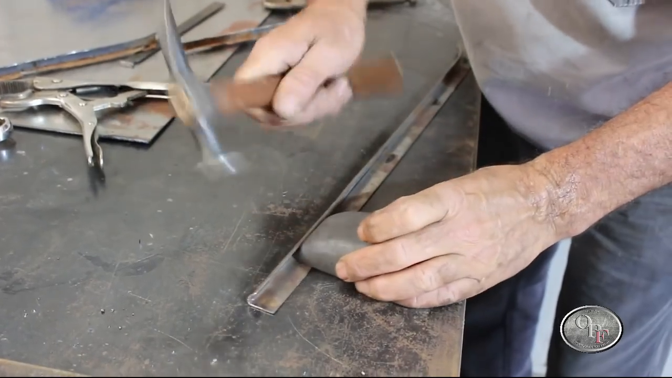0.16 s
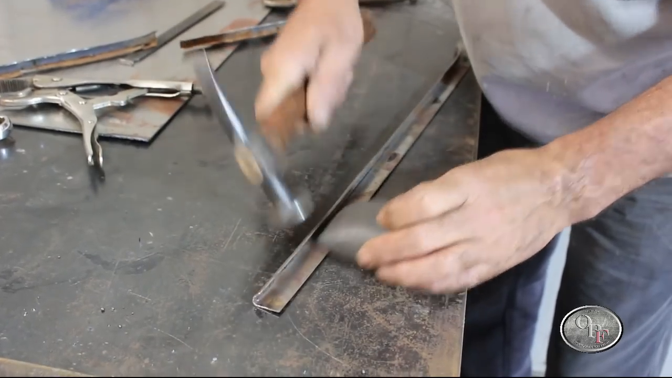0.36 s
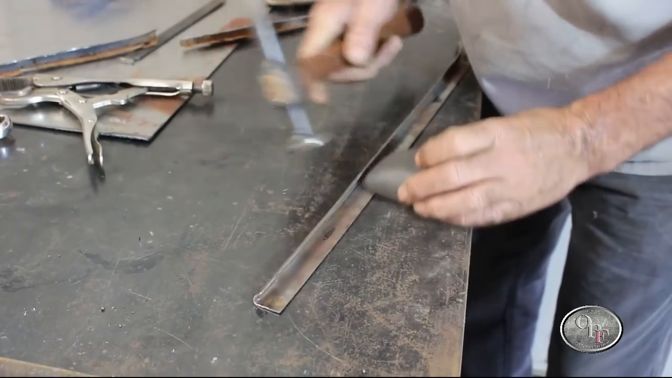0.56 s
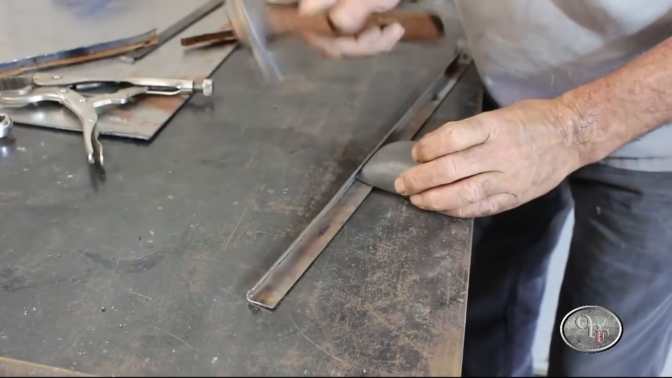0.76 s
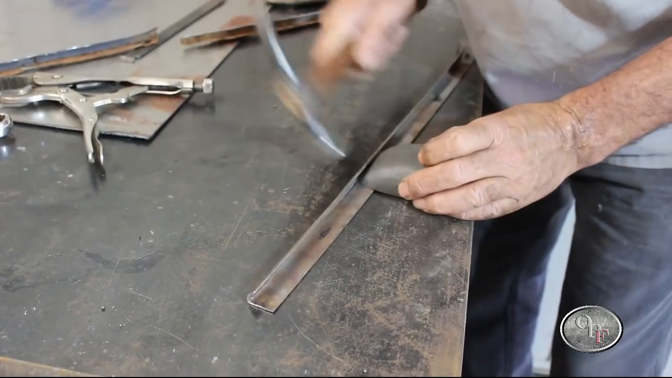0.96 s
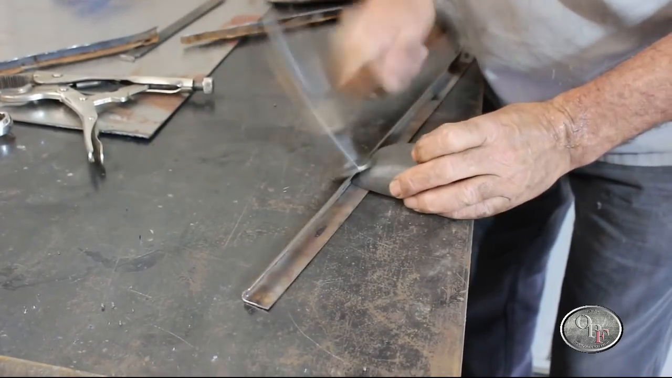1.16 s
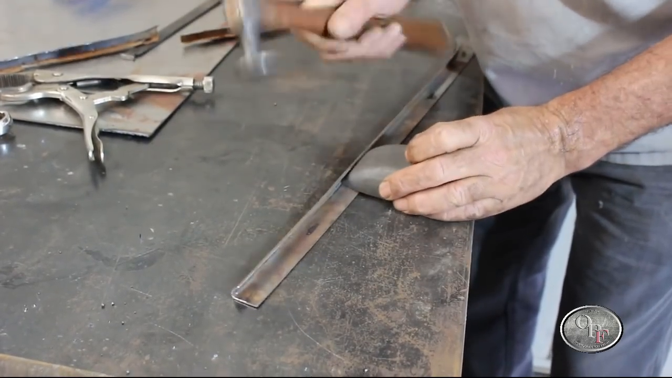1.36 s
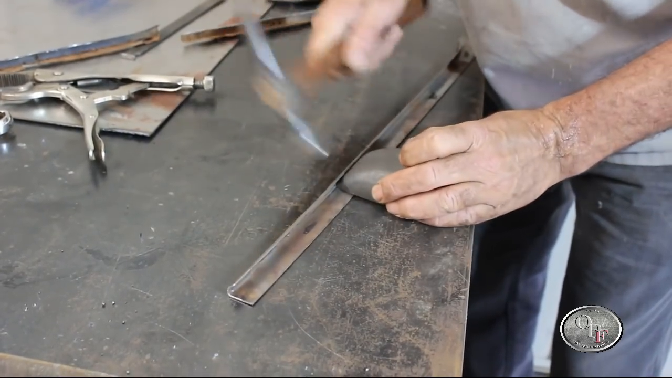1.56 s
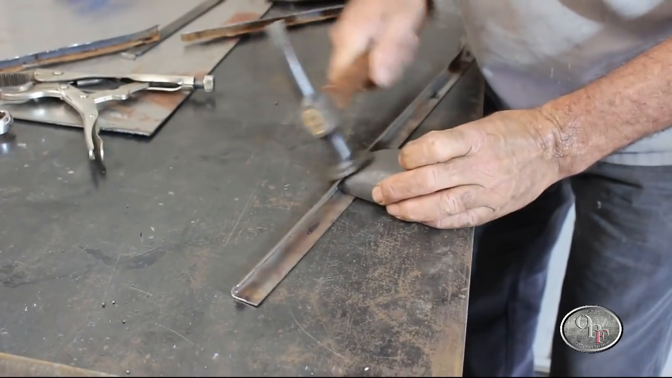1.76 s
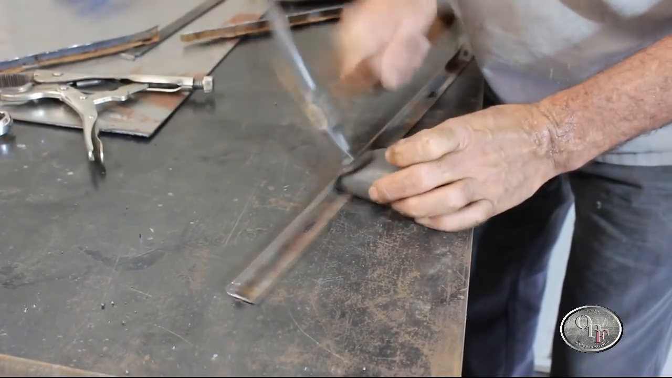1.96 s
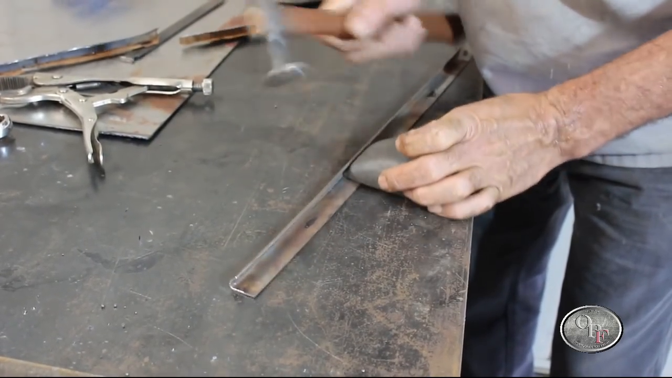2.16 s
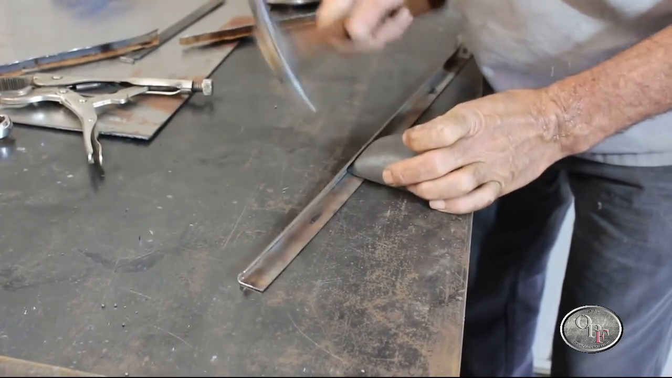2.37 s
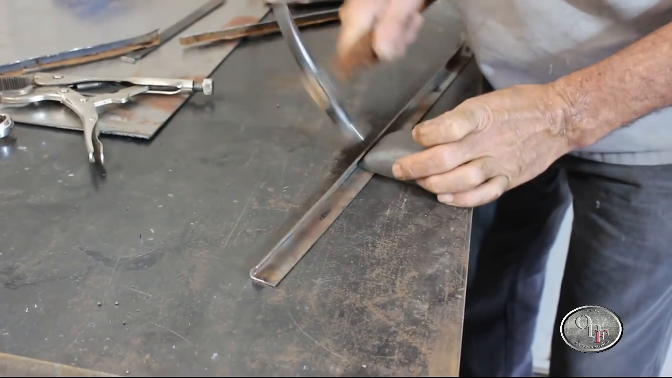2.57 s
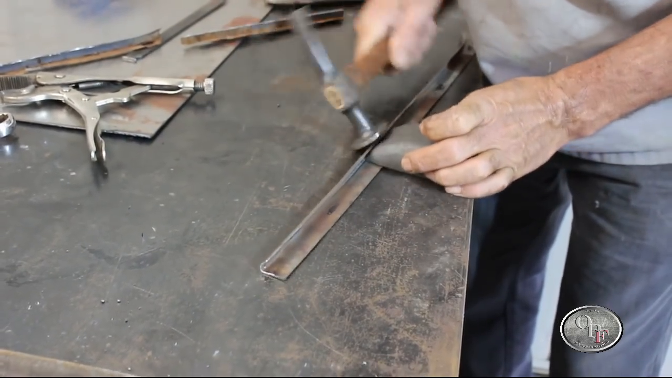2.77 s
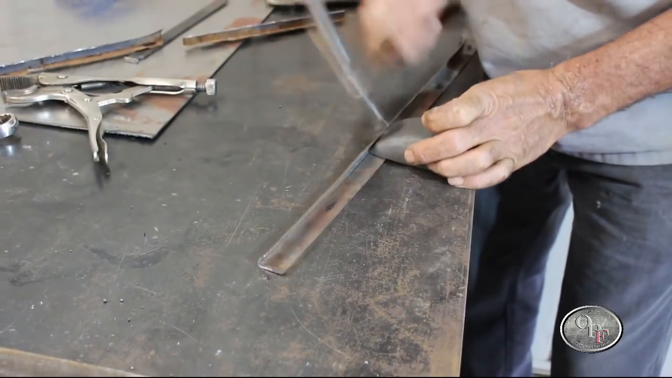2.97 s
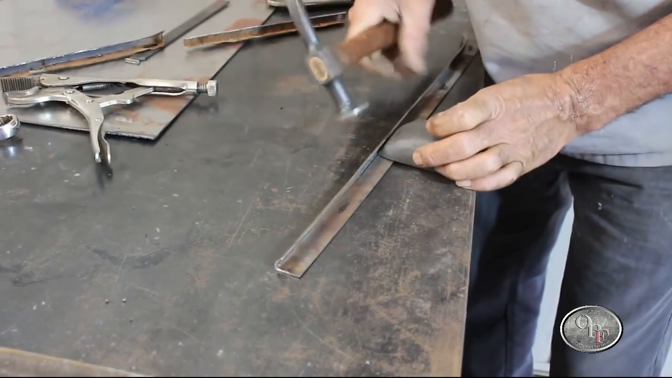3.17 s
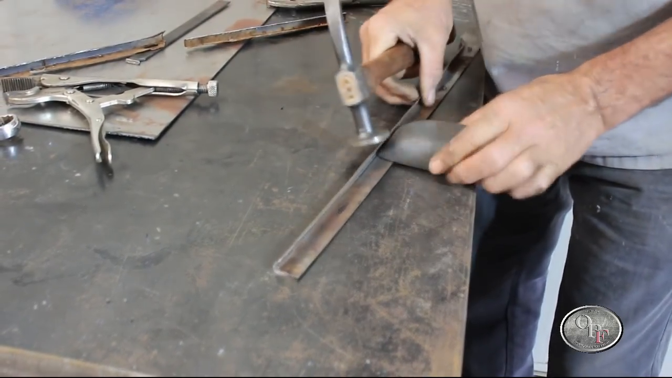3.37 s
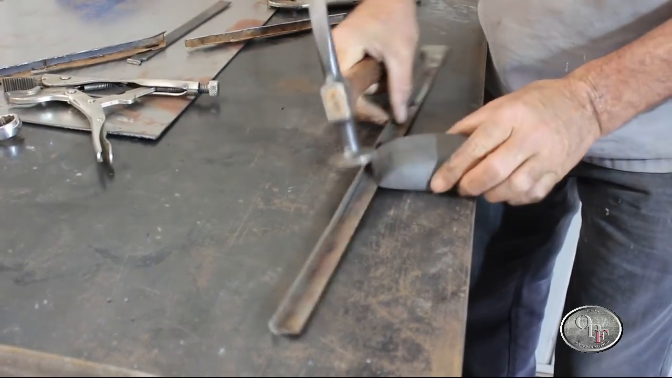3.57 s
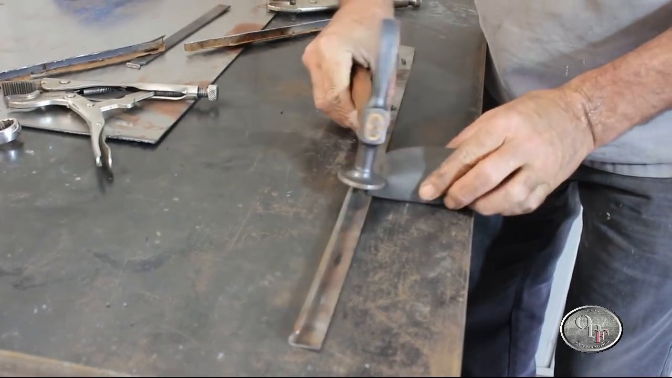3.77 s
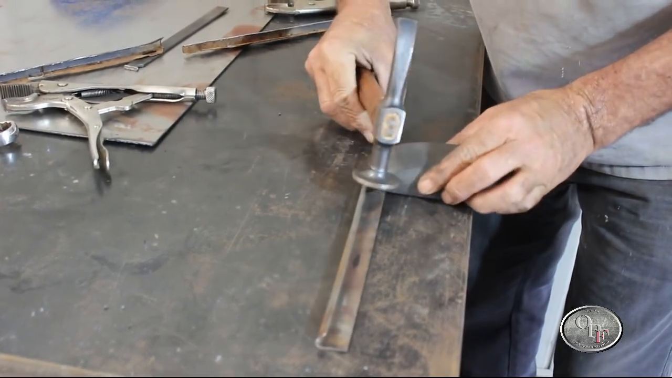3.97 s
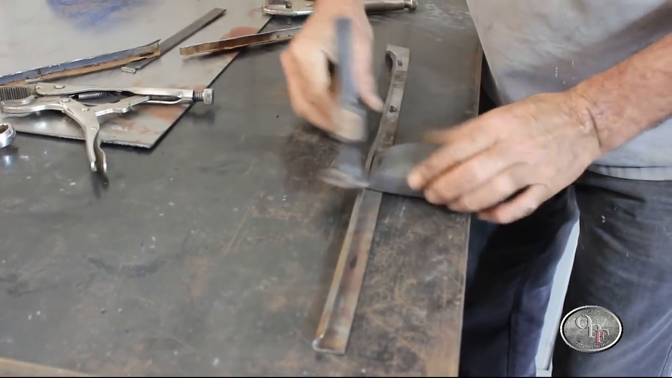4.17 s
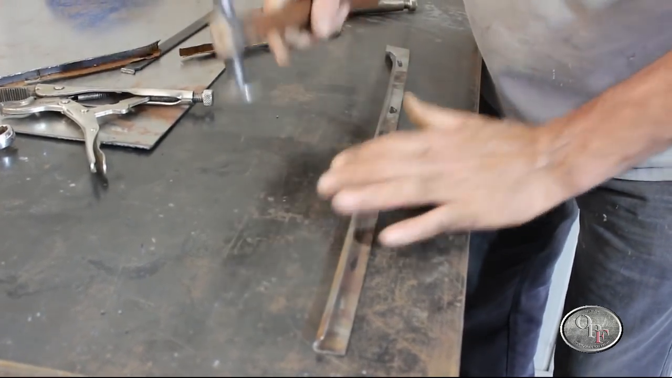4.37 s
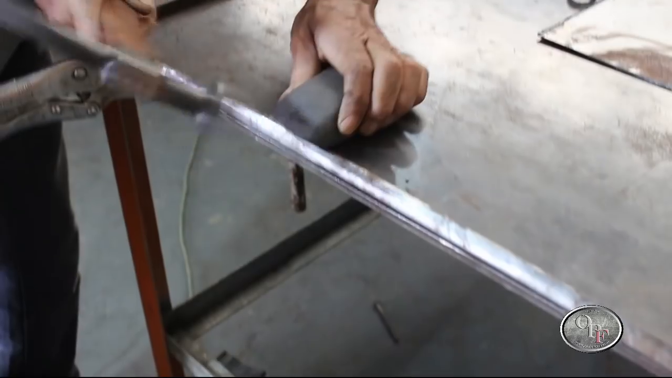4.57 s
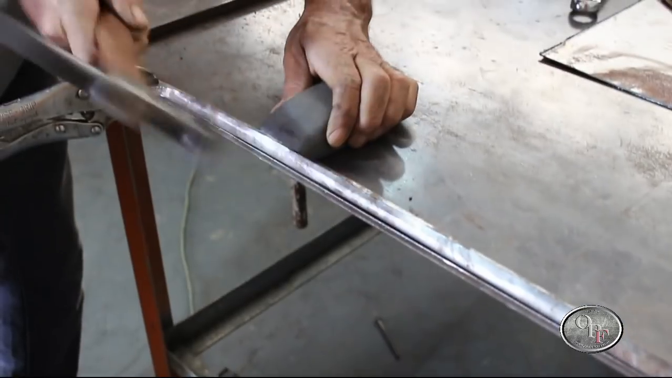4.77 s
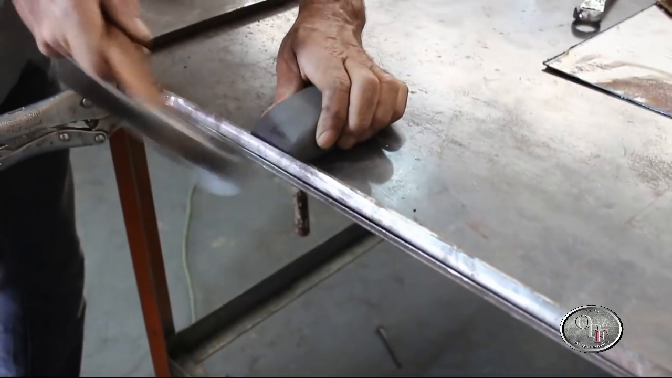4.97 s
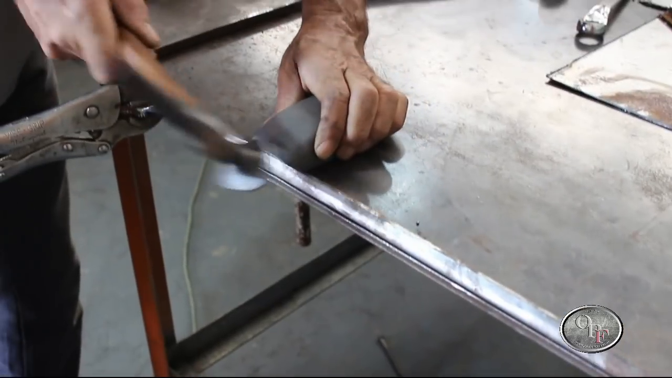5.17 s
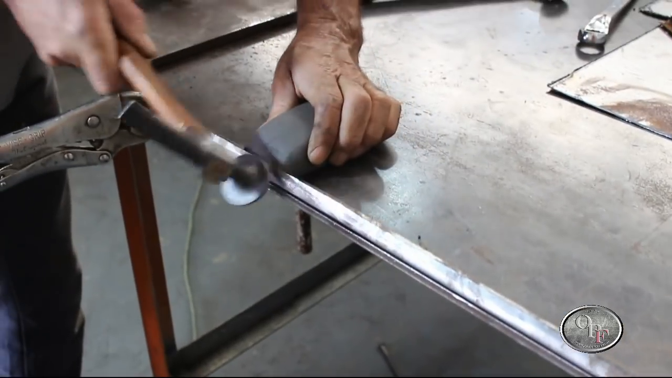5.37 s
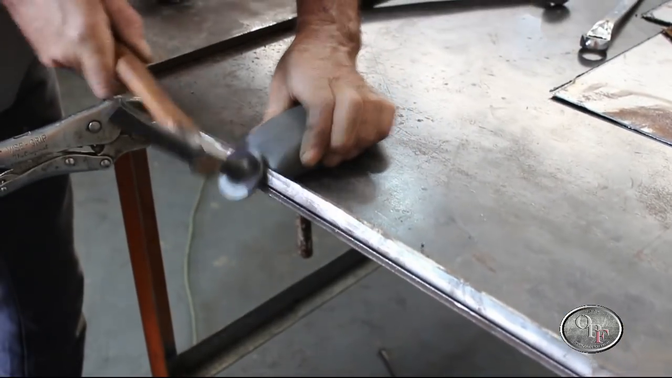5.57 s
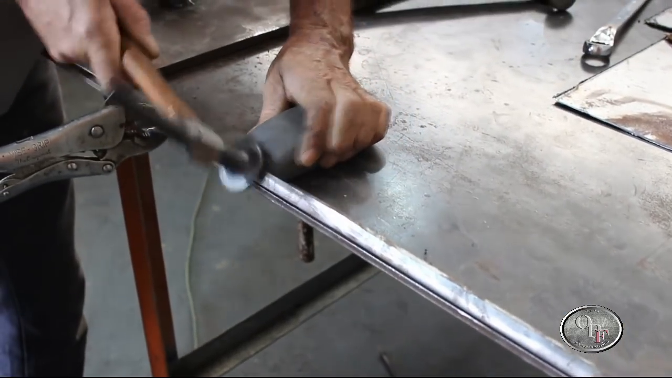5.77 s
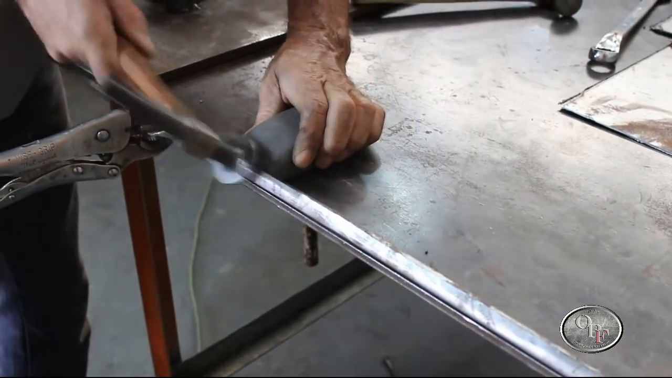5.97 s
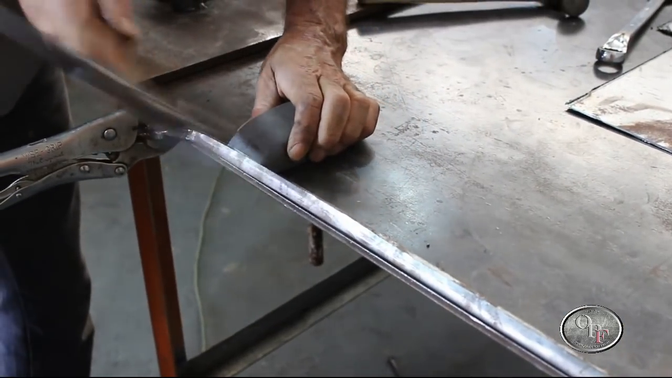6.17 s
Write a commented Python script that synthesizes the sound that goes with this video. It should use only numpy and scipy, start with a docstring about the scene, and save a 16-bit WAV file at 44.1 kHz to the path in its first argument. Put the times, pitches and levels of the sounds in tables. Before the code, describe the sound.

Close, mono and slightly distorted: bright metallic hammer blows on thin steel with short clangs, buzzing shivers, faint bench thuds and long hard reverberation. Two blows sound duller than the others. A pause leaves the decaying echo, faint scraping and light knocks of loose steel. Then it abruptly jumps to louder, quicker, regular blows on a clamped rail, with a fuller ring and continuous room wash over low air noise.

```python
"""A panel hammer dresses a folded steel strip on a hand-held steel block over a bench, in a large, hard workshop.
Each blow layers a noise crack, a clang of damped sines, a dense shiver, a thud, chatter and a long room wash.
Grainy scrapes slip in between blows; in the pause that follows, soft knocks set the freed strip ringing.
Then the scene jumps to faster hammering on a clamped steel rail, built from the same layers.
A low bed of air noise runs throughout, and the close mono microphone overloads on the blows."""
import sys
import numpy as np
from scipy import signal
from scipy.fft import rfft, irfft
from scipy.io import wavfile
from scipy.ndimage import uniform_filter1d

SR = 44100
rng = np.random.default_rng(int(sys.argv[2]) if len(sys.argv) > 2 else 0)


def wrap_up_sound(samples):
    """Save the sound to the file named by the first command line argument, as 16-bit audio."""
    columns = np.atleast_2d(samples).T
    # keep every value between -1 and 1, then stretch to whole-number steps
    tamed = np.clip(columns, -1, 1)
    steps = np.round(tamed * 32767).astype(np.int16)
    wavfile.write(sys.argv[1], SR, steps)


N = 274743
BLOW_T = np.arange(SR // 4) / SR  # time axis of one blow or knock [s]
LONG_T = np.arange(3 * SR // 2) / SR  # time axis of the room and the long ringing [s]

# Hammer blows: (time [s], level of the steel [dB], contact cut-off [Hz], relative level of the bench thud [dB])
BLOWS = [(0.0633, -2, 8150, -23), (0.3256, -3, 7205, -12), (.9526, -1, 10100, -14.5), (1.247, 3, 2720, -17),
         (1.5265, -1, 8900, -20.5), (1.7911, -3.5, 10300, -13), (2.0495, -0.5, 9500, -21.5),
         (2.2959, -2.5, 9950, -14.5), (2.5536, -1.5, 9600, -21.5), (2.8064, -5.5, 11200, -13.5),
         (3.0562, -4, 10300, -17.5), (3.3157, -4.5, 2220, -22), (4.6861, 2, 8750, -42),
         (4.916, 3, 9000, -26), (5.1403, 3, 9300, -31), (5.3717, 3, 9100, -28), (5.6084, 1.5, 9200, -24.5),
         (5.8275, 2.5, 8300, -23), (6.0503, 2, 9200, -20)]
# Block sliding on steel: (time [s], length [s], relative level [dB])
SCRAPES = [(.668, 0.043, -49), (1.2, .038, -24), (1.477, 0.05, -29.5), (2.388, 0.089, -34),
           (3.53, 0.16, -57), (3.632, 0.12, -52), (3.923, .12, -50)]
# Light knocks as the work is shifted: (time [s], relative level [dB], contact cut-off [Hz], t60 [s])
KNOCKS = [(3.781, -25, 3740, 0.12), (3.952, -24, 3400, 0.44), (3.975, -19.5, 6000, 0.052),
          (4.103, -29.5, 1700, 0.28), (4.475, -40, 810, .24)]

# Clang modes of each workpiece: (centre frequency [Hz], width before limits and scaling [Hz],
# mean relative level [dB])
STRIP_CLANG_MODES = [(1755, 140, 1), (2143, 22, -2.5), (2470, 170, 11), (2850, 33, 4.5), (2970, 98, -1),
                     (3350, 23, -20.5), (3900, 100, 2), (4950, 190, -34.5), (4650, 170, 4.5),
                     (5260, 120, -30), (6000, 100, -48.5), (6740, 34, -29), (7850, 45, -11)]
RAIL_CLANG_MODES = [(1403, 240, 5), (1760, 210, 7), (2950, 190, -2), (3243, 150, 13.5), (4000, 110, 6),
                    (5060, 33, -13), (5110, 190, 8.5)]
# Long, quiet ringing: bending modes of the workpiece, and in the strip's list the hammer's own high ring at
# 11224 Hz: (frequency [Hz], level re the thud column [dB], t60 [s])
STRIP_SINGING_MODES = [(230.5, -26.5, 0.76), (385, -28, 0.94), (1390, -28, 4.6), (2530, -29.5, .9),
                       (3960, -26, .7), (4547, -30.5, 0.68), (11224, -33, .4)]
RAIL_SINGING_MODES = [(173.6, -25, 3.3), (268.8, -17, 0.76), (390, -20.5, 3.1), (575, -14.5, 0.48),
                      (713, -13.5, 0.92), (833, -8.5, 0.7), (2510, -25, 0.58), (5170, -13, 0.64)]
# Modes of the strip lifted free of the block: (frequency [Hz], relative level [dB], t60 [s])
FREE_STRIP_MODES = [(1030, -11, .2), (1295, -11, 0.26), (2060, -15, 0.15), (2540, 3, .1), (2860, 5, 0.068),
                    (2910, -1, 0.066), (3940, 5, 0.083), (4400, -11, .2), (4680, -15, .2), (7600, -34, .3),
                    (10960, -12, 0.11), (12350, -11, 0.12)]

# Noise colours of each layer: (frequency [Hz], relative level per Hz [dB])
AIR_COLOUR = [(25, -36), (80, -7), (170, -1.5), (400, -3), (1400, -16), (4000, -28), (8000, -34.5),
              (15000, -49)]
CRACK_COLOUR = [(60, -35), (150, -19.5), (400, -15), (700, -12.5), (1200, -26.5), (2000, 0.5), (3500, -1.5),
                (5500, -3.5), (8500, -10), (12000, 1), (16000, -7)]
SHIVER_COLOUR = [(100, -35.5), (500, -15.5), (900, -5), (1500, 5), (2800, 5), (5000, -1.5), (8000, -15),
                 (16000, -41)]
THUD_COLOUR = [(20, -40), (50, -28), (120, -17.5), (220, 0), (340, 3.5), (520, -9.5), (1000, -26),
               (4000, -70.5)]
RUBBING_COLOUR = [(1000, -11), (3000, 12.5), (6000, 11), (9000, 3), (12500, 9.5), (16000, -12.5)]
KNOCK_COLOUR = [(80, -14), (300, -2.5), (900, 8), (1600, 8), (3000, 6.5), (4700, 9), (8000, -4),
                (13000, -20), (16000, -28)]
# Colour of the room's answer to each workpiece: (frequency [Hz], relative level [dB])
STRIP_ROOM_COLOUR = [(50, -34), (150, -20), (330, -7), (560, -10), (770, -1), (1600, 3.5), (2600, 3.5),
                     (4000, 2.5), (6000, -5.5), (9000, -22.5), (12500, -12), (16000, -30)]
RAIL_ROOM_COLOUR = [(50, -32.5), (150, -15.5), (330, -9.5), (550, -9), (850, -5.5), (1600, 3), (2800, 2.5),
                    (4200, 0), (6000, -7.5), (9000, -27), (12500, -13), (16000, -26)]
# Reverberation of the workshop: (frequency [Hz], t60 [s])
ROOM_T60 = [(100, 1.9), (400, 1.49), (1500, 1.236), (3000, 1.49), (5000, 1.134), (8000, 1.03),
            (14000, 0.73)]

AIR_DB = -50.5
# Contact cut-off of a blow squarely over the block; a blow beside it is softer and duller
SEATED_HZ = 9000
# A heavier blow [dB] or harder contact [octaves] pins the sheet to the block and halves its shiver's t60
SHIVER_HALVES_DB, SHIVER_HALVES_OCTAVES = 7, 1.55
# Harder contact makes the sheet chatter more on the block and wakes more of the room
CHATTER_DB_PER_OCTAVE, WASH_DB_PER_OCTAVE = 9, 0.83
# The room's wash and late swell grow with the force of the blow [dB per dB]
WASH_FOLLOWS, SWELL_FOLLOWS = 0.52, 1.12
# The far walls return that swell this long after the blow, spread over this time
LATE_SWELL_S, LATE_SPREAD_S = 0.23, 0.085
# Top of the boom that the bench sends into the room
BOOM_HZ = 345
# Rise constant of a knock as a share of its t60, and level offset of the strip's ring
KNOCK_RISE_SHARE, KNOCK_RING_DB = 0.021, -9
JUMP_S = 4.592
CUTOFF_HZ = 16000


def from_db(db):
    """Decibels to gain."""
    return 10 ** (np.asarray(db) / 20)


def rms_one(x):
    """Scale to rms 1."""
    return x / np.sqrt(np.mean(x ** 2) + 1e-20)


def at_hz(points, hz):
    """Read a table on a log-frequency axis."""
    table_hz, value = np.transpose(points)
    return np.interp(np.log(np.maximum(hz, 1)), np.log(table_hz), value)


def dying(t, t60):
    """Exponential decay, 60 dB down at t60."""
    return np.exp(-np.log(1000) * t / t60)


def add(out, s, sound):
    """Mix a sound in at time s, dropping what falls outside."""
    at = round(s * SR)
    part = sound[max(-at, 0):max(N - at, 0)]
    out[max(at, 0):max(at, 0) + len(part)] += part


def noise(colour, size):
    """Noise of the given colour, rms 1; on its own it is the air bed."""
    hz = np.arange(size // 2 + 1) * SR / size
    spectrum = rfft(rng.standard_normal(size)) * from_db(at_hz(colour, hz))
    return rms_one(irfft(spectrum, size))


def soften(x, cut_hz, keep):
    """A longer contact takes the treble away, all but the share that is kept."""
    lowpass = signal.butter(2, min(cut_hz, SR * 4 / 10), fs=SR, output="sos")
    return (1 - keep) * signal.sosfilt(lowpass, x) + keep * x


def burst(colour, t60):
    """Crack or thud: many close, damped modes struck at once, as dying noise of rms 1."""
    return rms_one(noise(colour, len(BLOW_T)) * dying(BLOW_T, t60))


def clang(modes, scatter_db, detune, ring_scale):
    """The hammer lands on a new spot each time, giving each mode a new strength and slightly new pitch; rms 1."""
    hz, width, db = np.transpose(modes)[:, :, None]
    strength, shift, phase = rng.standard_normal((3, len(hz), 1))
    decay = np.exp(-np.pi * np.clip(width, 35, 120) * BLOW_T / ring_scale)
    cycles = hz * (1 + detune * shift) * BLOW_T + phase
    gain = from_db(db + scatter_db * strength)
    return rms_one(np.sum(gain * np.sin(2 * np.pi * cycles) * decay, axis=0))


def shiver(t60):
    """Dense bending waves need a few milliseconds to spread over the sheet, then die away."""
    spread = 1 - np.exp(-BLOW_T / 0.0055)
    return noise(SHIVER_COLOUR, len(BLOW_T)) * dying(BLOW_T, t60) * spread


def rubbing(size, grain_db):
    """Steel on steel catches and slips, which makes its hiss grainy; rms 1."""
    grip = rms_one(uniform_filter1d(rng.standard_normal(size), size=90))
    return rms_one(noise(RUBBING_COLOUR, size) * from_db(grain_db * grip))


def ring(modes):
    """Long ringing: damped sines, started together."""
    return sum(from_db(db) * np.sin(2 * np.pi * hz * LONG_T) * dying(LONG_T, t60) for hz, db, t60 in modes)


def workshop(colour, build_s, early, count=5):
    """Room responses of unit energy: near surfaces answer at once, far walls later, the treble dies first."""
    edges = np.geomspace(40, 18000, 25)
    white, out = rng.standard_normal((2, count, len(LONG_T))), 0
    for k, (low, high) in enumerate(zip(edges, edges[1:])):
        hz = np.sqrt(low * high)
        bandpass = signal.butter(2, [low, high], "band", fs=SR, output="sos")
        band = signal.sosfilt(bandpass, white[k % 2])  # neighbouring bands use different noise
        out = out + band * from_db(at_hz(colour, hz)) * dying(LONG_T, at_hz(ROOM_T60, hz))
    out = out * np.interp(LONG_T, [0, .004, build_s], [0, early, 1])
    return out / np.sqrt(np.sum(out ** 2, axis=1, keepdims=True))


def wash(room, push, swell_db, late_db):
    """Every struck spot wakes its own blend of the room's paths; the echoes come back in swells, early or late."""
    paths = rms_one(rng.standard_normal(len(room)) @ room)
    moments = np.linspace(0, LONG_T[-1], 45)
    swells_db = swell_db * np.interp(LONG_T, moments, rng.standard_normal(len(moments)))
    late = np.exp(-((LONG_T - LATE_SWELL_S) / LATE_SPREAD_S) ** 2)
    echoes = paths * from_db(swells_db + late_db * late)
    return signal.fftconvolve(echoes, push)[:len(LONG_T)]


def room_push(contact_hz, push_db, boom_db):
    """The impact and its brief ring drive the room, giving the wash a fine ripple; the bench booms just after."""
    impact = 1. * (BLOW_T == 0)
    ripple = rms_one(rng.standard_normal(len(BLOW_T)) * dying(BLOW_T, .14))
    after_ring = .35 * ripple / np.sqrt(len(BLOW_T))
    push = from_db(push_db) * soften(impact + after_ring, contact_hz, keep=0.037)
    boom = from_db(boom_db) * soften(impact, BOOM_HZ, keep=0)
    return push + np.roll(boom, SR // 100)  # the bench answers 10 ms after the steel


def led_in(blows, count):
    """The hammering is already under way: blows like the first come before it, at the same tempo."""
    beat_s = np.median(np.diff([b[0] for b in blows]))
    return [(blows[0][0] - k * beat_s, *blows[0][1:]) for k in range(count, 0, -1)] + blows


def hammering(blows, modes, singing_modes, room, crack_db, crack_t60, clang_db, ring_scale, shiver_db,
              shiver_t60, chatter_db, bench_db, rise_s, room_db, late_db, boom_db):
    """Each blow excites steel, bench and room; its force and contact hardness set their balance."""
    out, singing = np.zeros(N), ring(singing_modes)
    usual_db = np.mean([b[1] for b in blows])
    for s, db, contact_hz, thud_db in blows:
        force_db, hard_octaves = db - usual_db, np.log2(contact_hz / SEATED_HZ)
        halvings = force_db / SHIVER_HALVES_DB + hard_octaves / SHIVER_HALVES_OCTAVES

        steel = from_db(crack_db) * burst(CRACK_COLOUR, crack_t60)
        steel += from_db(clang_db) * clang(modes, scatter_db=7.5, detune=0.017, ring_scale=ring_scale)
        steel += from_db(shiver_db) * shiver(shiver_t60 / 2 ** halvings)
        steel = soften(steel * (1 - np.exp(-BLOW_T / rise_s)), contact_hz, keep=0.025)
        thud = from_db(bench_db + thud_db) * burst(THUD_COLOUR, t60=0.046)
        chatter = rubbing(len(BLOW_T), grain_db=2.5) * dying(BLOW_T, t60=0.31)
        chatter = from_db(chatter_db + CHATTER_DB_PER_OCTAVE * hard_octaves) * chatter
        add(out, s, from_db(db) * steel + thud + chatter)

        push_db = room_db + WASH_FOLLOWS * force_db + WASH_DB_PER_OCTAVE * hard_octaves
        push = room_push(contact_hz, push_db, thud_db + boom_db)
        echoes = wash(room, push, swell_db=1.6, late_db=late_db + SWELL_FOLLOWS * force_db)
        add(out, s, from_db(thud_db) * singing + echoes)
    return out


def scraping(grain_db):
    """The block is dragged over the strip: each stroke of grainy hiss rises fast and fades slowly."""
    scrapes = np.zeros(N)
    for s, length, db in SCRAPES:
        size = int(length * SR)
        stroke = np.interp(np.arange(size) / size, [0, .2, 1], [0, 1.3, 0])
        add(scrapes, s, from_db(db) * stroke * rubbing(size, grain_db))
    return scrapes


def knocking():
    """The block is set down, and at the end a hand is laid on the strip: soft-edged noise knocks, and the loose
    strip's damped modes ring with them."""
    knocks, rings = np.zeros((2, N))
    for s, db, contact_hz, t60 in KNOCKS:
        shape = (1 - np.exp(-BLOW_T / (KNOCK_RISE_SHARE * t60))) * dying(BLOW_T, t60)
        knock = rms_one(soften(noise(KNOCK_COLOUR, len(BLOW_T)), contact_hz, keep=.02))
        add(knocks, s, from_db(db) * knock * shape)
        add(rings, s, from_db(db + KNOCK_RING_DB) * soften(ring(FREE_STRIP_MODES), contact_hz, keep=.2))
    return knocks, rings


def handling(room, grain_db, knock_room_db, scrape_room_db):
    """Scrapes and knocks are heard directly and along one path of the room; the strip's ring stays dry."""
    scrapes = scraping(grain_db)
    knocks, rings = knocking()
    sent = from_db(knock_room_db) * knocks + from_db(scrape_room_db) * scrapes
    return knocks + rings + scrapes + signal.fftconvolve(sent, room[0])[:N]


def scene():
    """The strip on the bench, then a sudden jump to the rail, whose earlier blows already fill the room."""
    bench_room = workshop(STRIP_ROOM_COLOUR, build_s=0.16, early=0.39)
    rail_room = workshop(RAIL_ROOM_COLOUR, build_s=0.21, early=0.022)
    strip_blows = led_in([b for b in BLOWS if b[0] < JUMP_S], count=2)
    rail_blows = led_in([b for b in BLOWS if b[0] > JUMP_S], count=3)

    strip = hammering(strip_blows, STRIP_CLANG_MODES, STRIP_SINGING_MODES, bench_room,
                      crack_db=-18.0, crack_t60=0.023, clang_db=-19.5, ring_scale=0.63,
                      shiver_db=-3.5, shiver_t60=0.089, chatter_db=-23, bench_db=-23.5,
                      rise_s=0.00013, room_db=-27.5, late_db=-.5, boom_db=-20.5)
    strip = strip + handling(bench_room, grain_db=4.5, knock_room_db=-15.5, scrape_room_db=5)
    rail = hammering(rail_blows, RAIL_CLANG_MODES, RAIL_SINGING_MODES, rail_room,
                     crack_db=-15.5, crack_t60=0.022, clang_db=-23.5, ring_scale=1.64,
                     shiver_db=-6.5, shiver_t60=0.11, chatter_db=-27, bench_db=-25,
                     rise_s=0.0018, room_db=-26.5, late_db=-1.0, boom_db=-3)

    jumped = np.clip((np.arange(N) / SR - JUMP_S) / .01, 0, 1)  # 10 ms crossfade
    air = from_db(AIR_DB) * noise(AIR_COLOUR, N)
    mono = (1 - jumped) * strip + jumped * rail + air
    return np.array([mono, mono])


def record(dry):
    """The blows overload the input, which rounds off their peaks; the deepest bass and the top are cut."""
    clipped = dry / (1 + dry ** 8) ** (1 / 8)
    bass_cut = signal.butter(1, 40, "high", fs=SR, output="sos")
    top_cut = signal.ellip(10, .1, 70, CUTOFF_HZ, fs=SR, output="sos")
    return signal.sosfilt(top_cut, signal.sosfilt(bass_cut, clipped))


dry = scene()
out = record(dry)
wrap_up_sound(out)
```